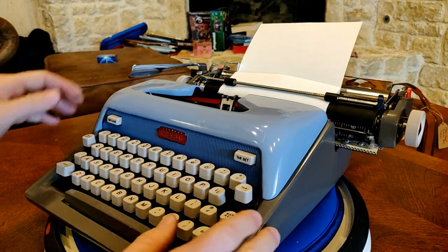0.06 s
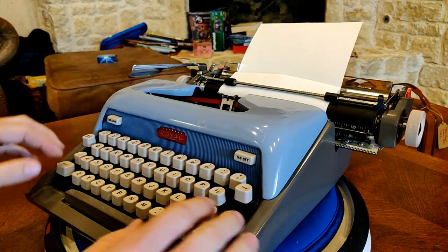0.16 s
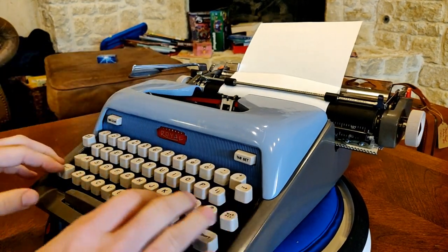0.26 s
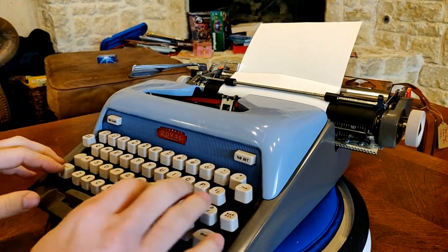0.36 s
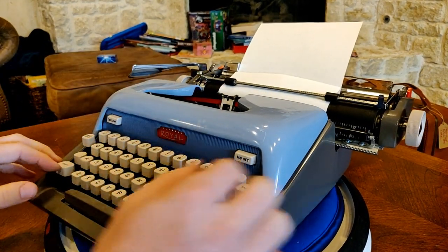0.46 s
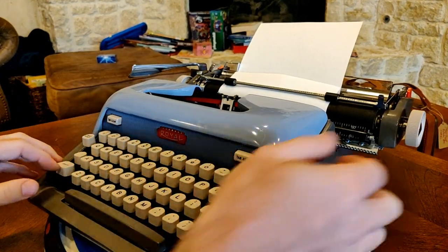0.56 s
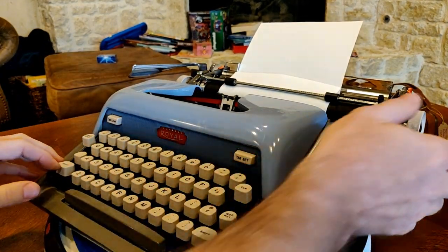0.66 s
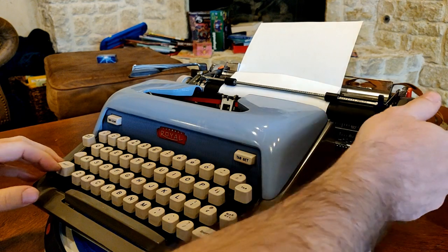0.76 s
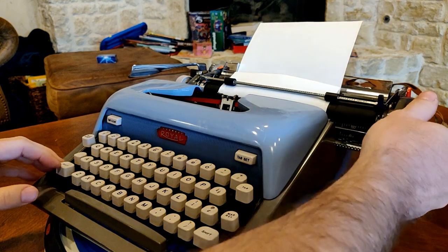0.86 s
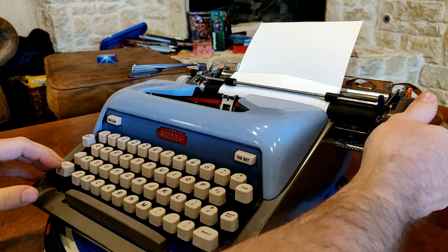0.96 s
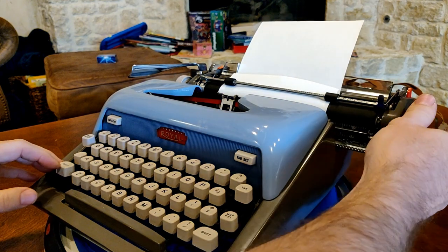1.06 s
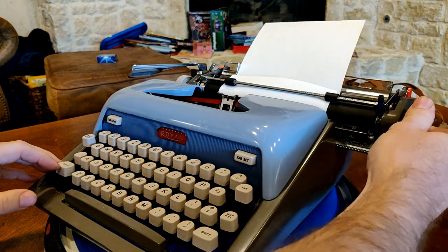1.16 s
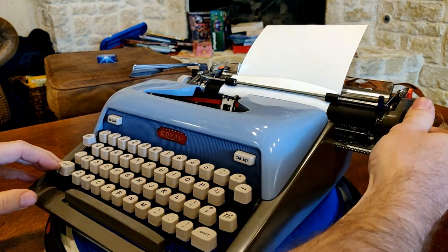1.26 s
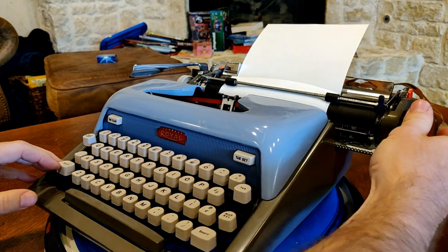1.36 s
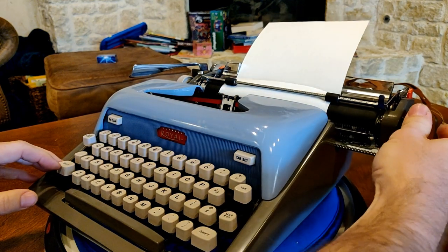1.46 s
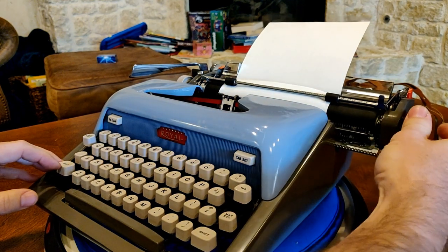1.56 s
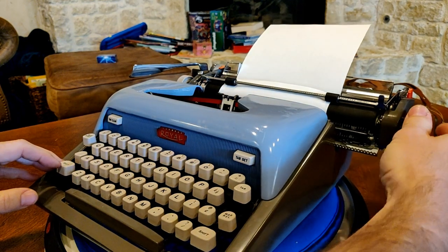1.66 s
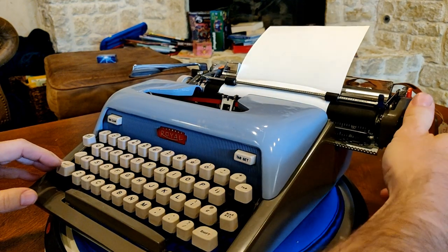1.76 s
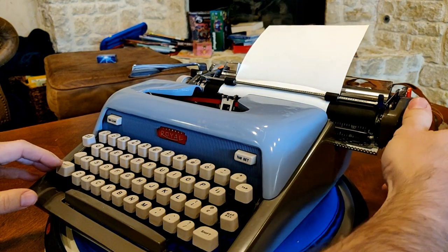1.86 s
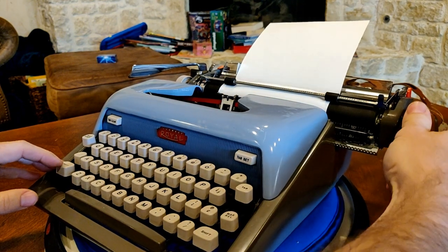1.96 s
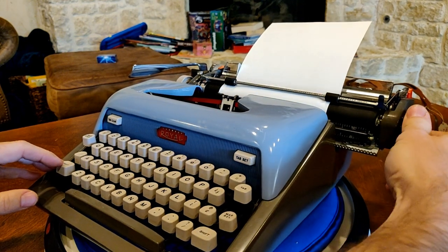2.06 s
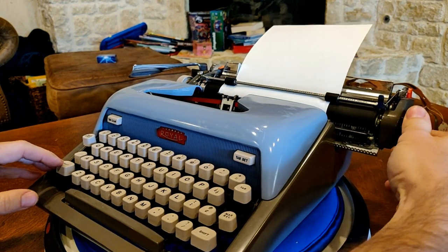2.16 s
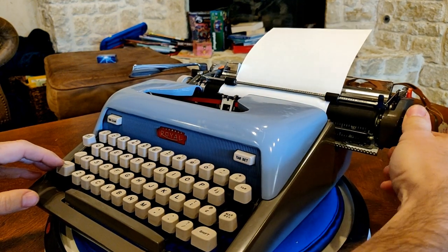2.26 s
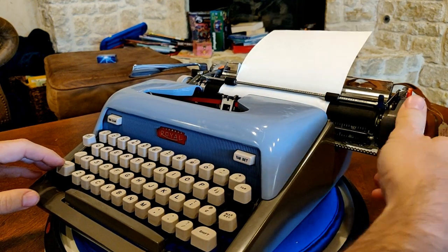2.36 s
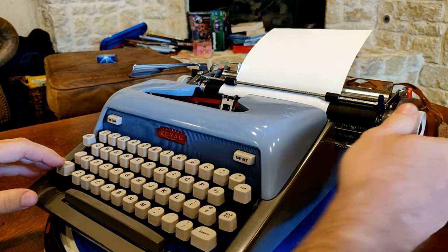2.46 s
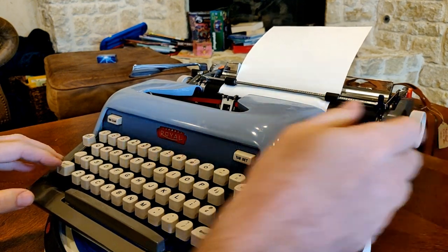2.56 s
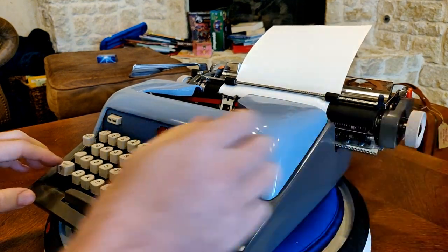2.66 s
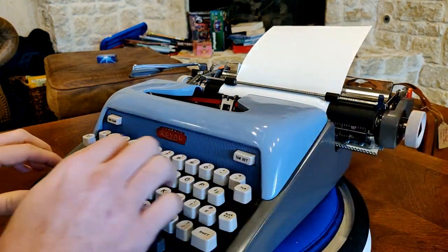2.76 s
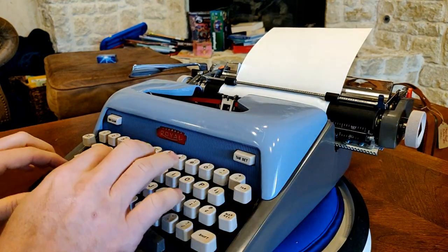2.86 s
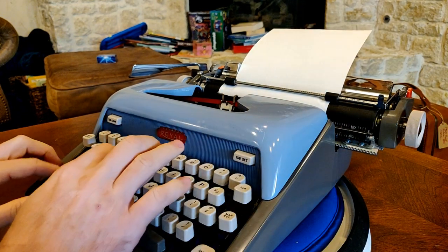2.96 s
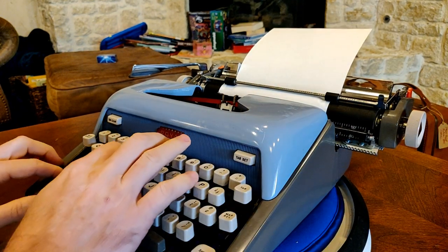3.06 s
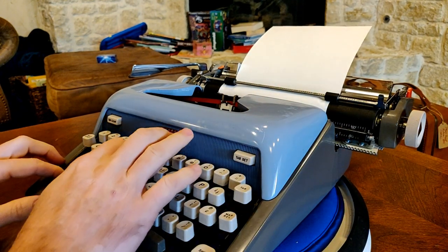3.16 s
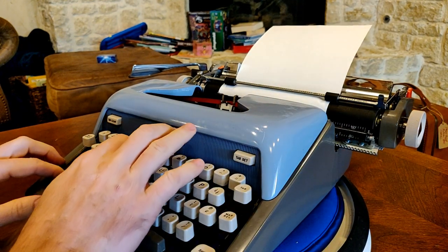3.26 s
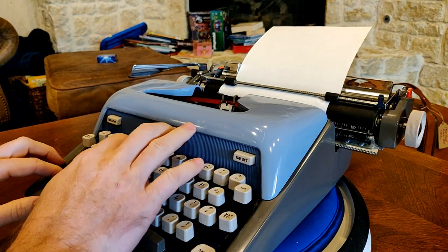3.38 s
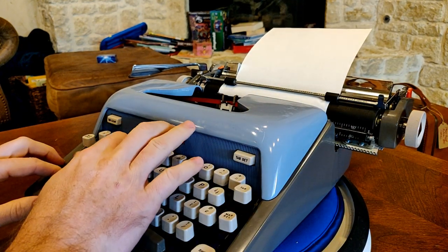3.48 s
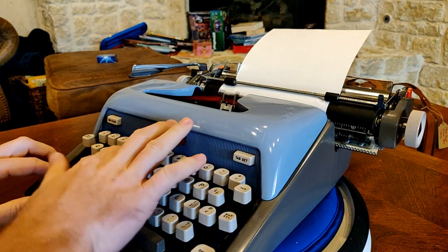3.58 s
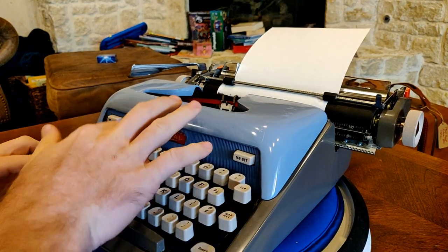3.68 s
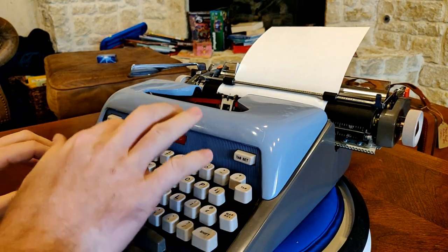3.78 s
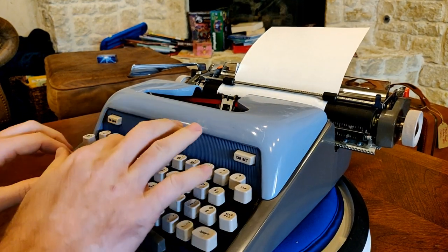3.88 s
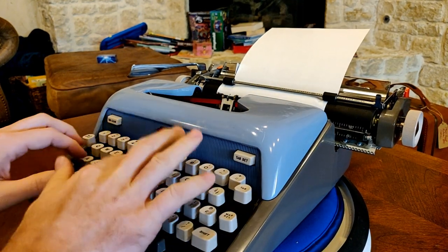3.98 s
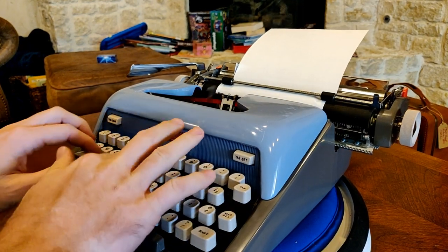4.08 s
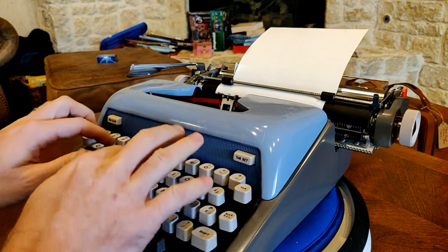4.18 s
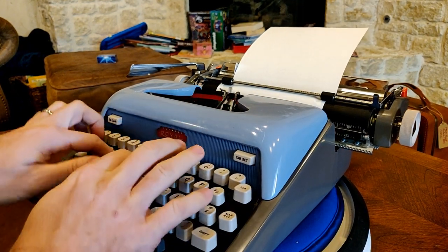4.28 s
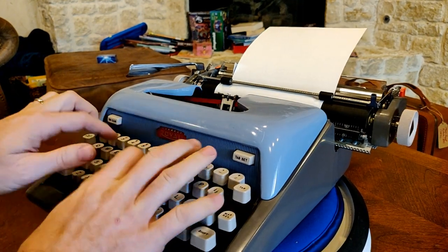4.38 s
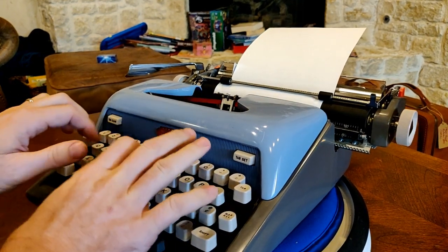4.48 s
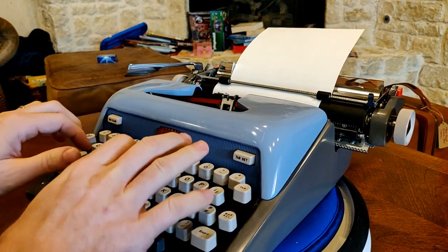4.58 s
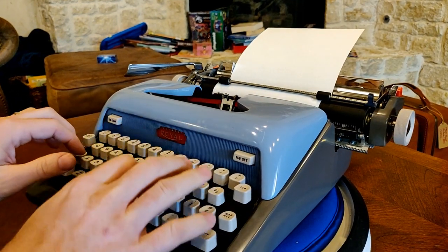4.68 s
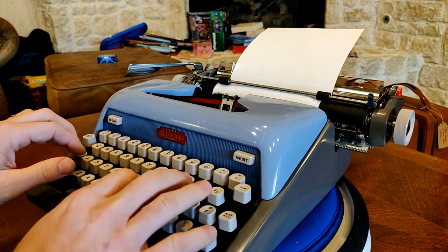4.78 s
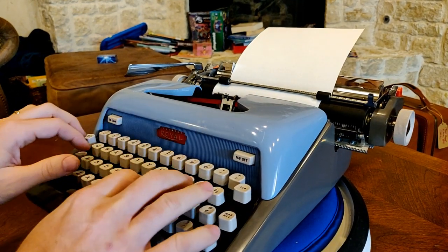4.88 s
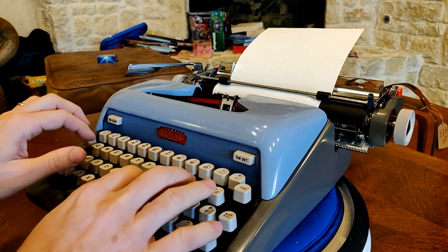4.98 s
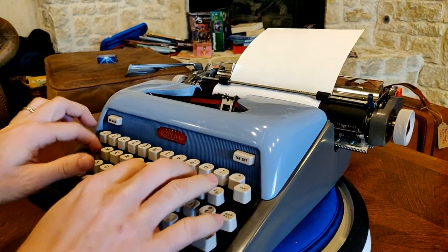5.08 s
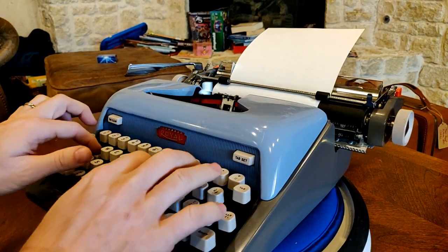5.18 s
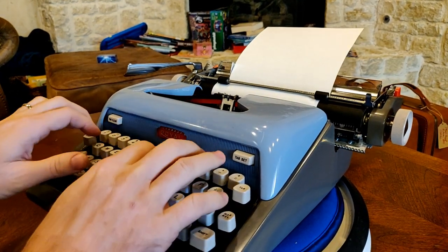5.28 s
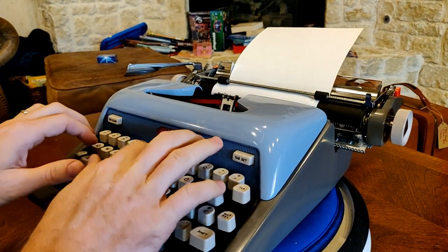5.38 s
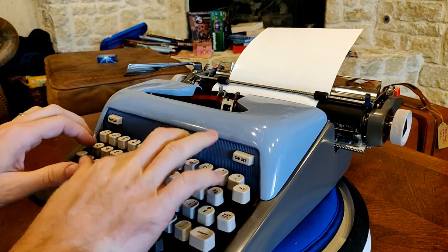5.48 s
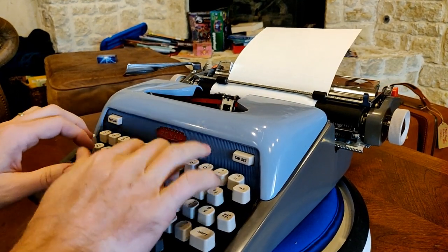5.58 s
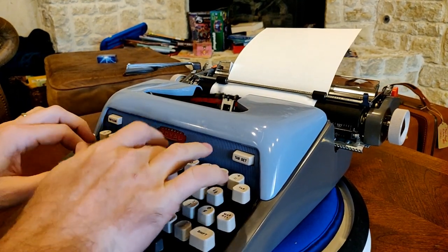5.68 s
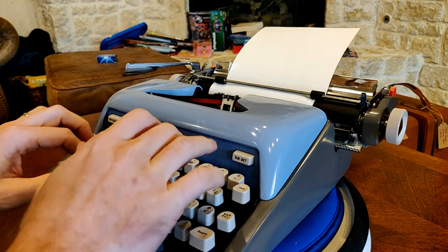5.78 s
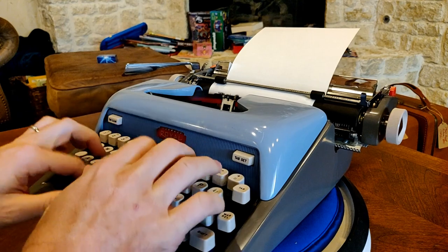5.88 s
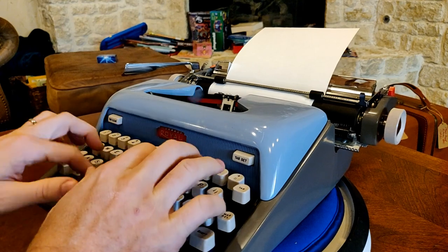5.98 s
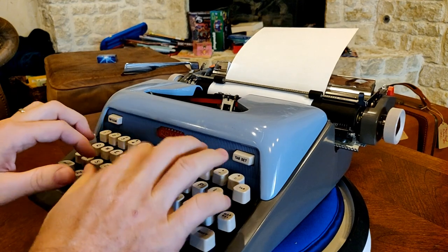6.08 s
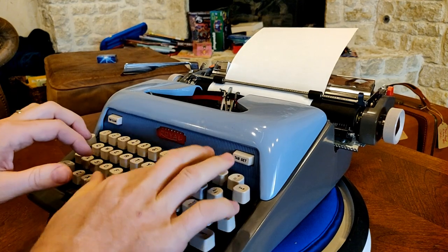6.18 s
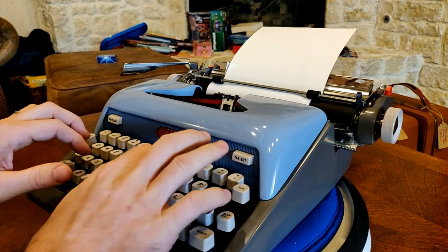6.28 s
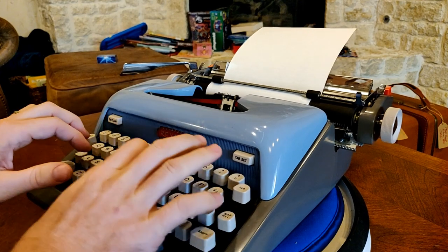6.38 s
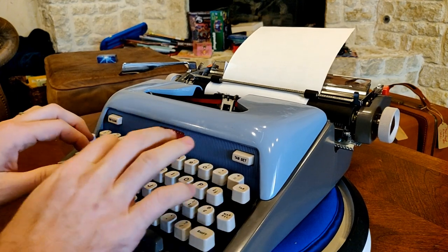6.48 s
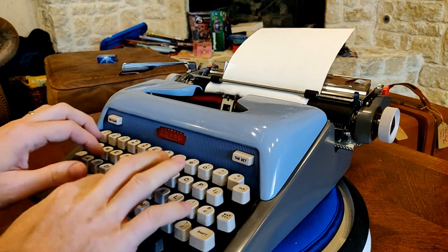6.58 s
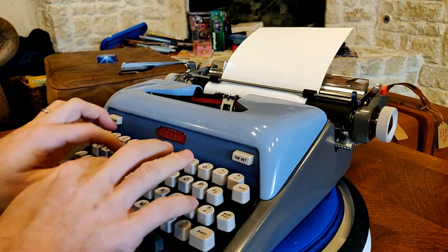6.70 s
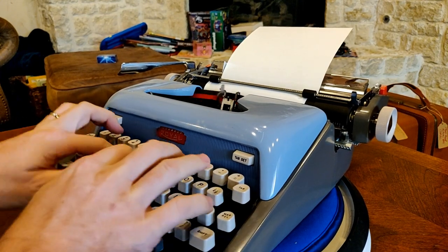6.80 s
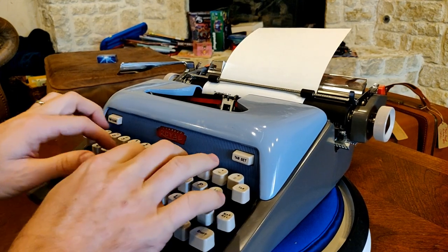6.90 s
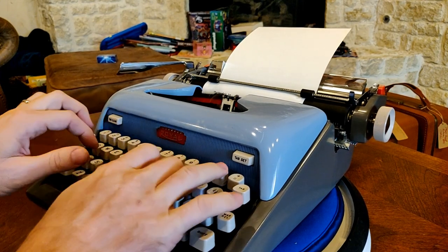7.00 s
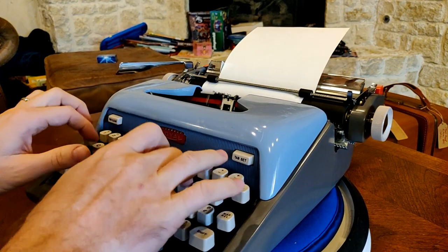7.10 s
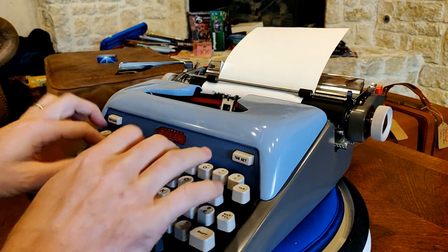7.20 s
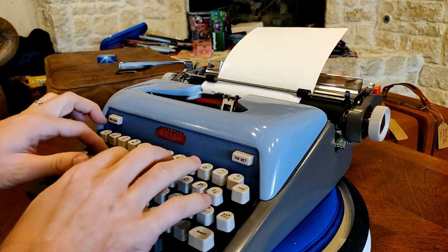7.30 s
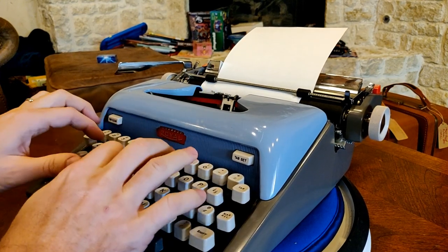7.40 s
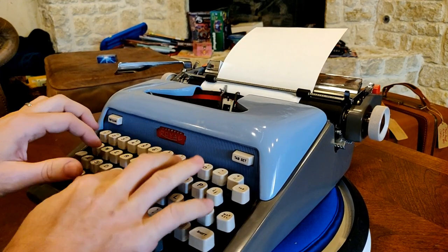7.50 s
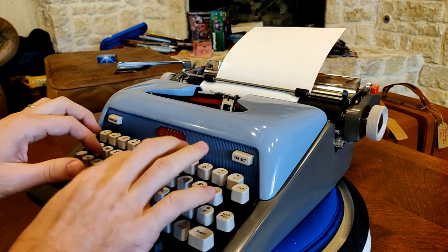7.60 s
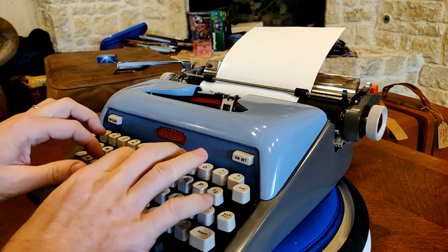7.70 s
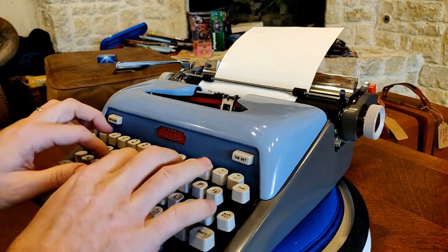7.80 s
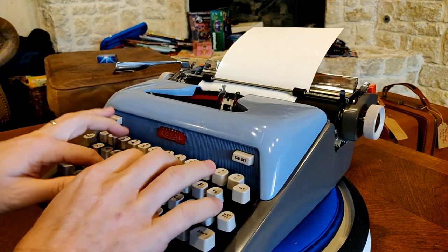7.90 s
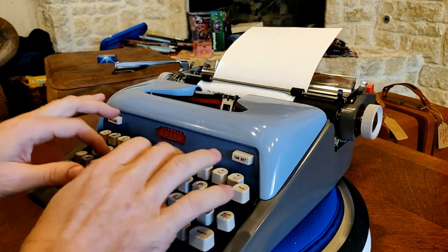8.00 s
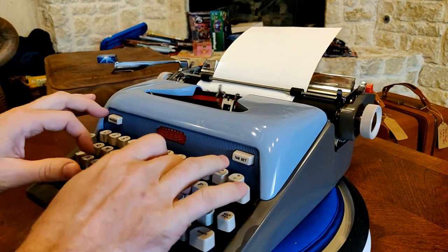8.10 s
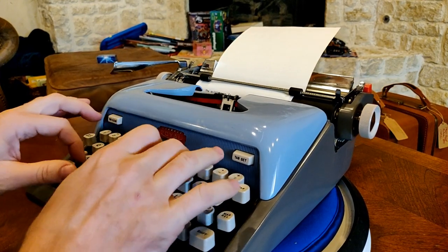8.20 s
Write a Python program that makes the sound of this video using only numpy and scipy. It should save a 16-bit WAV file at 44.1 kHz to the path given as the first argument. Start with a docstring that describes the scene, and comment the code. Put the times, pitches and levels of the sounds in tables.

```python
"""A quiet room, with a portable manual typewriter on a wooden table, close to two microphones.
Hands move over the machine and turn the paper roller a few notches, and a latch clinks. Then keys are
typed: levers click, the typebar (the arm that carries a letter) cracks on the roller, the carriage
steps on, and the parts fall back and rattle. The blows shake the steel (a high tick), the cover
(a clack) and the frame (a low thump). The walls echo briefly over a faint rumble and hiss."""
import sys
import numpy as np
from scipy import signal
from scipy.io import wavfile

SR = 44100
rng = np.random.default_rng(int(sys.argv[2]) if len(sys.argv) > 2 else 0)


def put_to_file(sound):
    """Save the sound as 16-bit audio at rate SR, in the file named by the first command-line argument."""
    columns = np.atleast_2d(sound).T  # one column per channel
    safe = np.clip(columns, -1, 1)
    whole_steps = np.round(safe * 32767)
    wavfile.write(sys.argv[1], SR, whole_steps.astype(np.int16))


N = 363825

# One typed letter a row: crack_s, press_before_s, return_after_s, rest_after_return_s,
# crack_db, thump_db, left_over_right_db, press_db, return_db, rest_db
LETTERS = [(3.6688, .0410, .0945, .0440, -6, -24, -2, -34, -38, -34),
           (4.0885, .0327, .1085, .0440, -2.5, -19, -2, -39, -38, -46),
           (4.3383, .0352, .1135, .0410, -1.5, -21, -2.5, -38, -36, -36),
           (5.1750, .0370, .1060, .0485, -2.1, -16, -3, -33, -38, -36),
           (5.5193, .0462, .1050, .0440, -6.5, -20.5, -.6, -45, -39, -44),
           (5.6889, .0380, .1125, .0445, -6.5, -22, 2.5, -38, -35, -36),
           (5.9714, .0308, .1140, .0430, -3.5, -24, 1.5, -37, -33, -36),
           (6.2172, .0335, .1240, .0505, -3, -17.5, 3.5, -37, -34, -35),
           (6.6710, .0335, .1070, .0440, -1.5, -21.5, .1, -35, -37, -46),
           (6.8449, .0340, .0870, .0465, -4.5, -18.5, 4.5, -47, -35, -35.5),
           (7.0947, .0382, .0890, .0445, -4.5, -18, 2.5, -40, -33, -36),
           (7.3092, .0336, .0880, .0435, -3, -19, 3, -31, -33, -37),
           (7.5642, .0343, .1235, .0440, -5, -20.5, 2.1, -35, -35, -38),
           (7.9535, .0320, .0955, .0432, -1.5, -17.5, .1, -44, -36, -35),
           (8.1431, .0340, .0762, .0440, -4, -18.5, 2.5, -47, -36, -40)]


def gain_of(db):
    """Turn decibels into a multiplier."""
    return 10 ** (np.asarray(db) / 20)


def unit_level(x):
    """Scale a signal to an average power of 1."""
    return x / np.sqrt(np.mean(x ** 2) + 1e-20)


def curve_at(points, hz):
    """Read a smooth path through (pitch, value) points at the given pitches."""
    pitch_hz, value = np.transpose(points)
    return np.interp(np.log(hz + 1), np.log(pitch_hz + 1), value)


def add(mix, start_s, sound):
    """Mix a sound in at its start time."""
    part = mix[..., round(start_s * SR):][..., :sound.shape[-1]]
    part += sound[..., :part.shape[-1]]


def push(force, start_s, parts_db, contact):
    """Add a contact to the force on steel, cover and frame, each at its own level."""
    add(force, start_s, gain_of(parts_db)[:, None, None] * contact)


def tone_filter(*curves):
    """The quickest filter that colours a sound by the sum of these decibel curves."""
    hz = np.fft.rfftfreq(4096, 1 / SR)
    db = sum(curve_at(curve, hz) for curve in curves)
    log_gain = np.log(gain_of(np.r_[db, db[-2:0:-1]]))
    return np.fft.ifft(np.exp(np.conj(signal.hilbert(log_gain)))).real[:1024]


def ring(force, tones):
    """A struck part rings with pure tones; each one drops 60 dB in its fade_s."""
    t = np.arange(SR // 2) / SR
    note = sum(gain_of(db - 60 * t / fade_s) * np.sin(2 * np.pi * hz * t) for hz, db, fade_s in tones)
    return signal.oaconvolve(force, note[None] / np.linalg.norm(note))[:, :N]


def rough(shape, likeness=0.54):
    """A rough contact pushes like noise, partly different on the left and right."""
    a, b = rng.standard_normal((2, 3, shape.shape[-1]))
    noise = np.stack([a, likeness * a + np.sqrt(1 - likeness ** 2) * b], axis=1)
    noise[2] += .08  # the heavy frame also feels the smooth push
    return shape * noise


def knock(contact_s, chatter=0.26, slowness=(1.1, 1.8, 1.6)):
    """A quick rise and slower fall, then loose chatter; the cover and frame take the blow more slowly than the
    steel."""
    t = np.arange(round(.12 * SR)) / SR
    age = t / (contact_s * np.array(slowness)[:, None, None])
    blow = age * np.exp(1 - age)
    return rough(blow + chatter * (1 - np.exp(-age)) * np.exp(-t / 0.035))


def hush():
    """Low room rumble and microphone hiss."""
    noise_colour = [(12, -22.5), (20, 2), (33, -6), (113, 1.5), (145, -3), (187, -1), (345, -10),
                    (891, -16), (969, -14), (1560, -22.5), (2120, -24.5), (3400, -25.5), (15800, -26.5)]  # strength of the noise: pitch_hz, level_db
    side_likeness = [(60, 0.97), (240, 0.64), (950, 0.074), (3770, 0.011), (15000, -0.48)]  # how alike left and right are: pitch_hz, likeness
    hz = np.fft.rfftfreq(2048, 1 / SR)
    a, b, c, d = rng.standard_normal((N // 512 + 5, 1025, 4)).T
    likeness = curve_at(side_likeness, hz)[:, None]
    left = a + 1j * b
    right = likeness * left + np.sqrt(1 - likeness ** 2) * (c + 1j * d)
    spectrum = np.array([left, right]) * gain_of(curve_at(noise_colour, hz))[:, None]
    noise = signal.istft(spectrum, nperseg=2048, noverlap=1536)[1][:, :N]
    return gain_of([[-62], [-63]]) * unit_level(noise)


def rattle():
    """Moving hands and levers shake loose parts into many tiny, uneven knocks."""
    # Hands moving over the machine before the typing: time_s, steel_db, cover_db, frame_db
    handling = [(0.0, -32, -40, -40), (0.028, -65, -57, -45.5), (0.134, -69, -61, -50),
                (0.22, -79, -79, -74), (0.5, -88, -81, -71), (0.704, -70, -74, -67),
                (0.976, -99, -89, -63.5), (1.272, -81, -75, -51.5), (1.416, -77, -73, -75),
                (1.536, -70, -59, -49), (1.638, -82, -74, -66), (1.782, -78, -77, -54),
                (1.95, -76, -82, -72), (2.164, -57, -62, -53), (2.3, -85, -76.5, -71),
                (2.516, -82, -77, -53), (2.638, -80, -84, -76), (2.844, -84, -77, -67),
                (3.03, -72, -74, -55), (3.12, -74, -66, -45.5), (3.352, -90, -80, -81)]
    times_s, *columns = np.transpose(handling)
    motion = gain_of([np.interp(np.arange(N) / SR, times_s, db, -150, -150) for db in columns])
    t = np.arange(-.2, .4, 1 / SR)
    for time_s, db, _, shake in key_levers() + space_bar():
        if shake:
            *parts_db, swell_s, fade_s = shake
            shape = np.exp(-np.where(t < 0, (t / swell_s) ** 2, t / fade_s))
            add(motion, time_s + t[0], gain_of(np.add(db, parts_db))[:, None] * shape)
    knocks = gain_of(3.2 * rng.exponential(1, N)) * (rng.random(N) < 150 / SR)  # about 150 a second
    lumps = 0.81 + unit_level(signal.lfilter([1], [1, -.993], knocks))
    a, b = rng.standard_normal((2, 3, N)) * lumps
    return motion[:, None] * unit_level(np.stack([a, 0.24 * a + 1.3 * b], axis=1))


def stray_knocks(force):
    """Hands bump the machine, the latch knocks, and levers rattle as some keys are let go."""
    bumps = [(0.0247, -39.5, -44.5, -51, 0.0018), (0.08, -46.5, -60, -50, 0.0018),
             (0.2905, -64, -76, -62, 0.0015), (0.9868, -68, -75, -53, 0.0011),
             (1.736, -75, -55, -58, 0.00054), (1.7689, -70, -61.5, -49.5, 0.0014),
             (2.1392, -36.5, -43.5, -51.5, 0.00099), (2.8985, -70, -63.5, -70, 0.0016),
             (2.9927, -55.5, -59, -64, 0.001), (3.05, -49.5, -37, -35, 0.0025),
             (3.8514, -47, -46, -38.5, 0.0053), (5.5809, -45, -44.5, -38, 0.0067),
             (5.7501, -60, -60, -35.5, 0.0015), (6.311, -56, -57, -43, 0.0068),
             (7.419, -37, -48, -42, 0.0022)]  # single blows: start_s, steel_db, cover_db, frame_db, contact_s
    for start_s, *parts_db, contact_s in bumps:
        push(force, start_s, parts_db, knock(contact_s))


def finger_taps(force):
    """Fingers tap the hollow knob, cover and space bar: adds the knocks, returns the short notes."""
    taps = [(.582, -51.5, 770, 750, 0.041), (.877, -54.5, 1010, 900, 0.029), (1.26, -46, 1365, 602, 0.13),
            (2.375, -52.5, 940, 945, 0.076), (2.421, -58, 1210, 900, .05), (4.487, -24, 364, 320, 0.06)]  # hollow notes: start_s, level_db, first_pitch_hz, last_pitch_hz, fade_s
    notes = np.zeros((2, N))
    t = np.arange(SR // 8) / SR
    for start_s, db, first_hz, last_hz, fade_s in taps:
        push(force, start_s, np.add(db, [-20, -22, -4.5]), knock(.002))
        hz = last_hz + (first_hz - last_hz) * np.exp(-t / 0.011)  # slides as the finger settles
        add(notes, start_s, gain_of(db - 60 * t / fade_s) * np.sin(2 * np.pi * np.cumsum(hz) / SR))
    return notes


def scrape(swell_s, fade_s, roundness=1.14):
    """Rubbing that grows to a peak after 0.08 s, then fades."""
    t = np.arange(-.08, .12, 1 / SR)
    return rough(np.exp(-np.where(t < 0, -t / swell_s, t / fade_s) ** roundness))


def roller(force):
    """The paper roller drags over each notch with a scrape that swells to a click."""
    # One notch a row: click_s, steel_db, cover_db, frame_db, swell_s, fade_s, click_over_scrape_db
    notches = [(1.058, -55, -52, -52.5, 0.023, 0.0083, 8), (1.202, -55.5, -52.5, -58, 0.021, 0.032, -2),
               (1.444, -46.5, -49.5, -46.5, 0.022, 0.01, 5.5), (1.547, -46.5, -49, -44, 0.025, 0.016, 3),
               (2.018, -40.5, -42.5, -43, 0.017, 0.012, 2.5)]
    for click_s, *parts_db, swell_s, fade_s, click_db in notches:
        push(force, click_s - .08, parts_db, scrape(swell_s, fade_s, roundness=1.8))
        push(force, click_s, np.add(parts_db, [-4, 1.5, 3]) + click_db, knock(0.00058))


def latch():
    """A sprung latch on the carriage clinks once and leaves a faint ring."""
    tones = [(2455, -19, .45), (2500, -20, .3), (2380, -3, .04), (2620, -2, .04), (2762, -2, .05),
             (3000, -1, .04), (3300, -2, .03)]  # the ringing latch: pitch_hz, level_db, fade_s
    out = np.zeros((2, N))
    blow = knock(0.00036, chatter=0.11)[0]
    clink = ring(blow / np.linalg.norm(blow[0]), tones)
    add(out, start_s=2.1385, sound=gain_of(-9) * clink)
    return out


def key_levers():
    """Each key goes down, comes back, and its typebar lands. Lists (time_s, level_db, blow, shake)."""
    # blows: [steel_db, cover_db, frame_db], contact_s
    press, back, rest = ([1.4, -8, -1.1], .0013), ([.1, -4.5, 2], .0022), ([1.1, -13, -1.5], .001)
    # shakes: steel_db, cover_db, frame_db, swell_s, fade_s
    swing, fall_back = (-21, -13, -6.5, .0002, .05), (-16, -11, -5.5, .03, .037)
    contacts = []
    for crack_s, lead_s, back_s, rest_s, *_, press_db, back_db, rest_db in LETTERS:
        contacts += [(crack_s - lead_s, press_db, press, swing),
                     (crack_s + back_s, back_db, back, fall_back),
                     (crack_s + back_s + rest_s, rest_db, rest, None)]
    return contacts


def crack():
    """The metal letter bites with one sharp edge, then slaps flat; the rubber roller dulls the treble."""
    bite = knock(.0003, chatter=.03, slowness=(1, 1, 2))
    slap = knock(.0006, chatter=.05, slowness=(1, 1, 2))
    blow = .8 * bite + .42 * np.roll(slap, shift=60, axis=2)
    blow[..., 8] -= 3.5  # the sharp edge
    blow = signal.sosfilt(signal.butter(1, 8000, fs=SR, output="sos"), blow)
    return 4.12 * blow / np.linalg.norm(blow, axis=2, keepdims=True)  # the finger sets the energy


def typebars(force):
    """Each bar scrapes into its guide and cracks on the roller; the carriage then jumps on and shakes."""
    clack_db, step_delay_s = -22, .0155
    for crack_s, _, _, _, crack_db, thump_db, pan_db, *_ in LETTERS:
        parts_db = [crack_db, clack_db, thump_db]
        sides = gain_of([[pan_db / 2], [-pan_db / 2]])
        push(force, crack_s, parts_db, sides * crack())
        push(force, crack_s - .08, np.add(parts_db, [-26, -14, -12]), scrape(0.0084, 0.0069))
        step_db = np.add(crack_db, [-29, -35, -27.5])
        push(force, crack_s + step_delay_s, step_db, knock(0.0031, chatter=0.32))


def space_bar():
    """The bar goes down and up, the carriage is caught, the bar settles. Same layout as key_levers."""
    # One space a row: start_s, held_s, catch_after_release_s, rest_after_release_s,
    # down_db, up_db, rest_db
    spaces = [(4.4850, .0870, .0366, .0785, -33.5, -39, -42), (6.4150, .0840, .0250, .0760, -37, -42, -34),
              (7.7156, .0894, .0380, .0815, -39, -45, -36.5)]
    down, up = ([.1, -3, 5.4], .002), ([-4, -2.5, 3.2], .01)
    catch, rest = ([2.9, -1.1, 7], .0017), ([.1, -12, -4], .0014)
    shake = (-16, -9, -5, .02, .07)
    contacts = []
    for start_s, held_s, catch_s, rest_s, down_db, up_db, rest_db in spaces:
        up_s = start_s + held_s
        contacts += [(start_s, down_db, down, shake), (up_s, up_db, up, None),
                     (up_s + catch_s, up_db, catch, shake), (up_s + rest_s, rest_db, rest, None)]
    return contacts


def typewriter_body(force):
    """Force becomes sound: the steel ticks with a faint ring, while cover and frame ring on."""
    # The tones each part rings with: pitch_hz, level_db, fade_s
    steel_tones = [(4710, 0.0065, 0.012), (5430, 0.0088, 0.041), (6430, 0.0047, 0.016),
                   (6650, 0.0076, 0.071), (8480, 0.0038, 0.14), (8380, 0.0052, 0.053)]
    cover_tones = [(835, 36.5, 0.056), (956, 18.5, 0.27), (1260, 24.5, 0.14), (1570, 7.5, .02),
                   (1700, 14.5, .03), (1970, 19.5, 0.028), (2550, -27, 0.025)]
    frame_tones = [(95, -24, 0.25), (141.1, -7, 0.35), (210, -3, 0.061), (252, -6.5, .1),
                   (310.3, -2, 0.089), (369.2, 7.5, 0.045), (431.8, 6, 0.058), (502, -0.5, 0.071),
                   (564.3, -3.5, 0.085), (631, -14, 0.13), (763.6, -19, 0.035)]
    steel, cover, frame = force
    tick = signal.sosfilt(signal.butter(2, 2600, "high", fs=SR, output="sos"), steel)
    tick = gain_of(3.5) * tick + gain_of(-18.5) * ring(steel, steel_tones)
    clack = signal.sosfilt(signal.butter(2, [800, 3000], "band", fs=SR, output="sos"), cover)
    clack = gain_of(13) * clack + gain_of(-5.5) * ring(cover, cover_tones)
    # The frame is too small to give off deep bass, and its thump is nearly alike on both sides.
    frame = signal.sosfilt(signal.butter(2, 90, "high", fs=SR, output="sos"), frame)
    thump = gain_of(0.5) * ring(0.89 * frame[:1] + 0.13 * frame, frame_tones)
    return tick + clack + thump


def room_echo(sound):
    """The walls send back many small echoes, each pitch dying away at its own speed."""
    fade_times = [(100, 0.76), (260, 0.18), (700, 0.61), (1840, 0.5), (4850, 0.52), (12800, 0.29)]  # time for the echo to drop 60 dB: pitch_hz, fade_s
    wall_colour = [(100, -11), (1000, -9.5), (5000, -13.5), (15000, -4)]  # how strongly the walls answer: pitch_hz, level_db
    echoes = np.zeros((3, 2, SR))
    arrivals = np.arange(200, SR - 20, 20) + rng.integers(0, 20, (3, 2, (SR - 201) // 20))
    np.put_along_axis(echoes, arrivals, rng.choice([-1., 1.], arrivals.shape), 2)
    hz, t, spectrum = signal.stft(echoes, SR, nperseg=256)
    spectrum *= gain_of(-60 * t / curve_at(fade_times, hz)[:, None])
    tails = signal.istft(spectrum, SR, nperseg=256)[1][..., :SR * 2 // 3]
    tails /= np.linalg.norm(tails[0, 0])
    tails = signal.oaconvolve(tails, tone_filter(wall_colour)[None, None])
    # Three echo tails fade in turn, so the echo does not ring at fixed pitches.
    cycles = 1.3 * np.arange(N) / SR + np.arange(3)[:, None, None] / 3
    turns = np.cos(2 * np.pi * cycles) * np.sqrt(2 / 3)
    return signal.fftconvolve(sound * turns, tails, axes=2).sum(0)[:, :N]


def scene():
    """Every contact drives the typewriter, and two microphones hear it with the room."""
    # The colour of each microphone's opening, and the colour both share: pitch_hz, level_db
    left_opening = [(60, 0), (1000, 0), (3000, 0), (4500, 0), (5400, 6), (6150, 10), (6900, 1), (7700, -4),
                    (10000, -10), (12000, -14), (14300, -8), (15600, -7)]
    right_opening = [(60, -4), (1000, -3.5), (3000, -3.5), (4500, 0), (6000, 2), (7000, -2), (8300, 3),
                     (10000, -3), (11500, -8), (13300, -6), (14700, -1), (15600, -1)]
    shared_colour = [(60, -6), (1000, 2.5), (3200, -3), (4500, -2), (6200, -1.87), (8000, -2.5),
                     (11000, -0.95), (13500, 0), (15600, -1.5)]
    force = np.zeros((3, 2, N))  # steel, cover, frame; left, right; samples
    stray_knocks(force)
    tap_notes = finger_taps(force)
    for time_s, db, (parts_db, contact_s), _ in key_levers() + space_bar():
        push(force, time_s, np.add(db, parts_db), knock(contact_s))
    roller(force)
    typebars(force)
    near = typewriter_body(force + rattle()) + latch() + tap_notes
    near[0] = np.roll(near[0], shift=3)  # the left microphone is a little farther away
    microphones = np.array([tone_filter(side, shared_colour) for side in (left_opening, right_opening)])
    return signal.oaconvolve(near + room_echo(near), microphones, axes=1)[:, :N] + hush()


def record(dry):
    """Softly squeeze the loudest cracks, then cut the highest treble."""
    ceiling, cutoff_hz = 1.05, 15900
    squeezed = ceiling * np.tanh(dry / ceiling)
    treble_cut = signal.firwin(511, cutoff_hz, window=("kaiser", 9), fs=SR)
    return signal.oaconvolve(squeezed, treble_cut[None], "same")


dry = scene()
out = record(dry)
put_to_file(out)
```